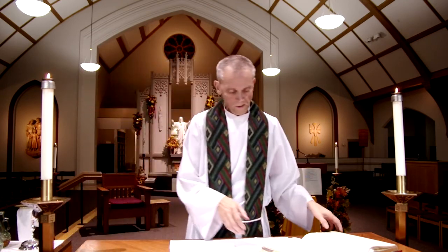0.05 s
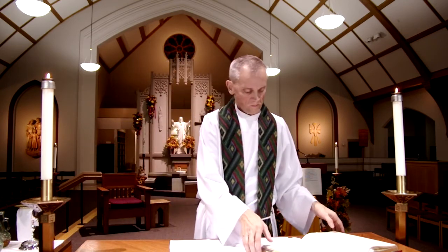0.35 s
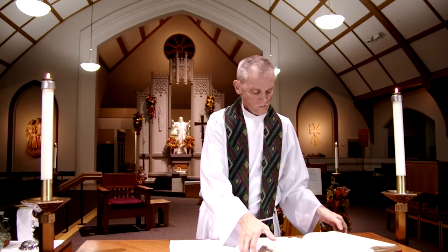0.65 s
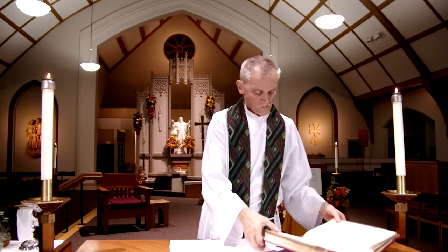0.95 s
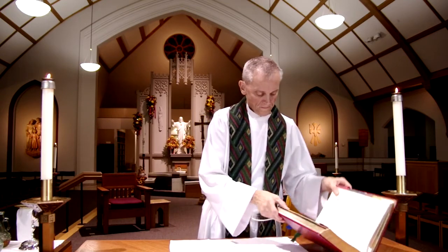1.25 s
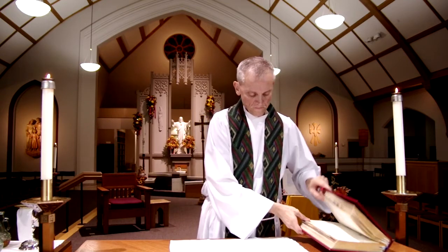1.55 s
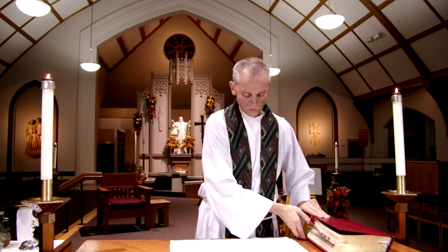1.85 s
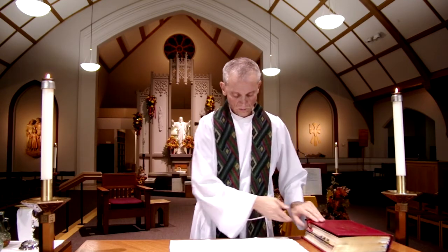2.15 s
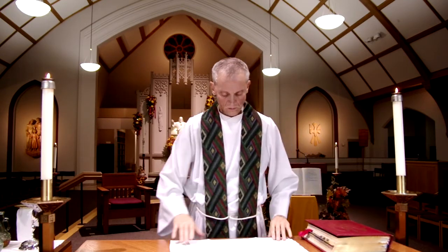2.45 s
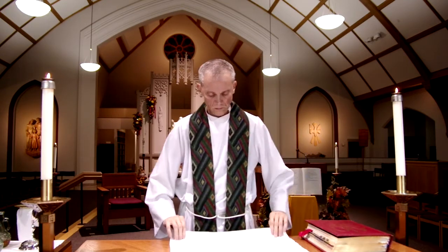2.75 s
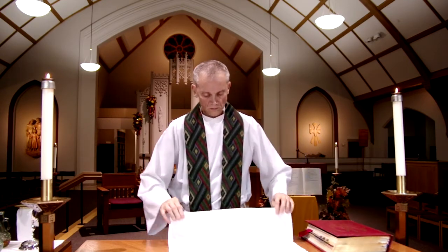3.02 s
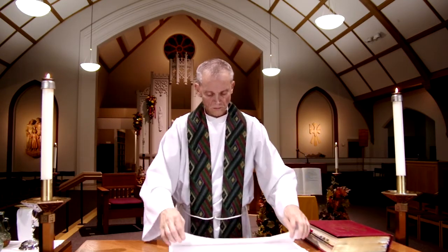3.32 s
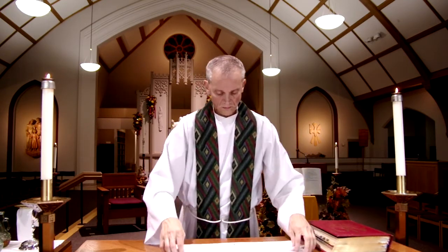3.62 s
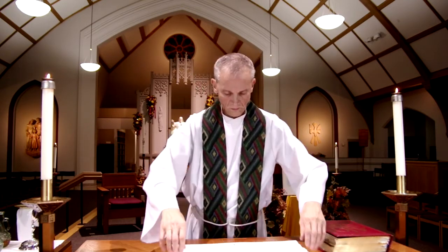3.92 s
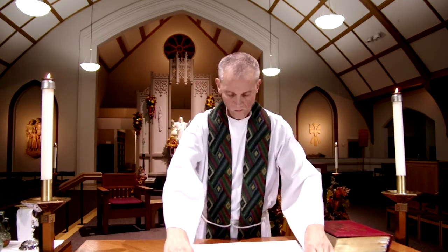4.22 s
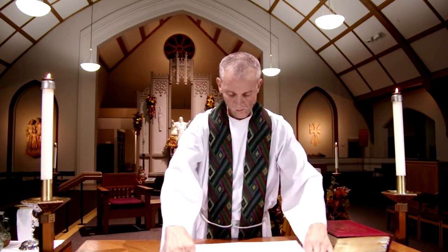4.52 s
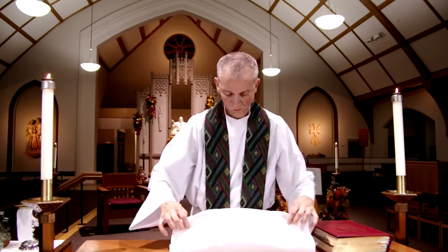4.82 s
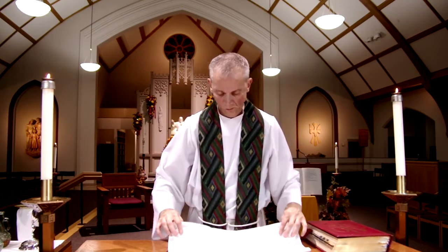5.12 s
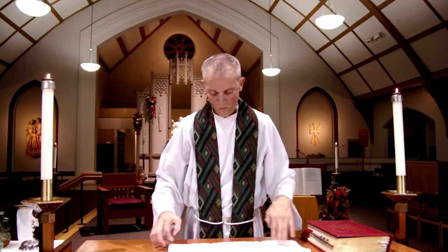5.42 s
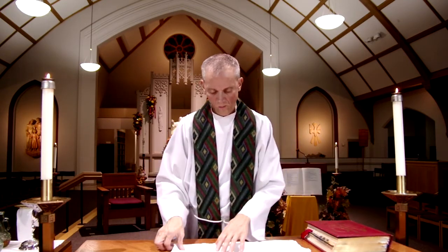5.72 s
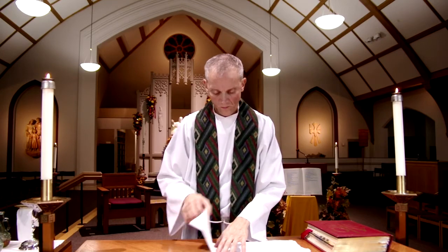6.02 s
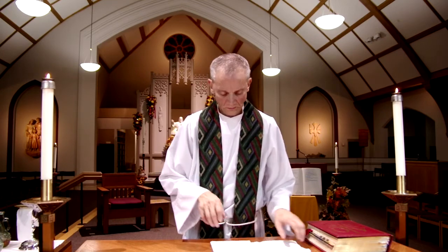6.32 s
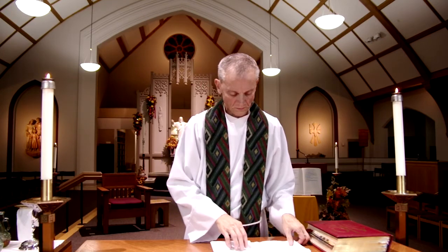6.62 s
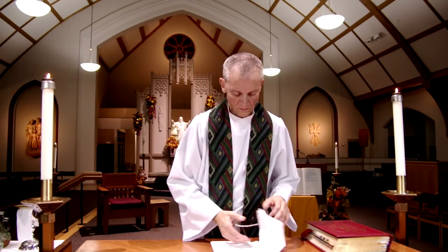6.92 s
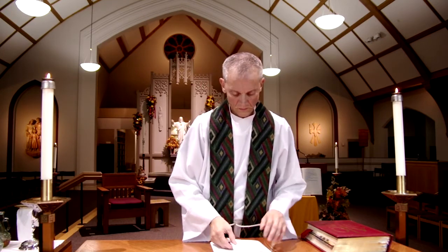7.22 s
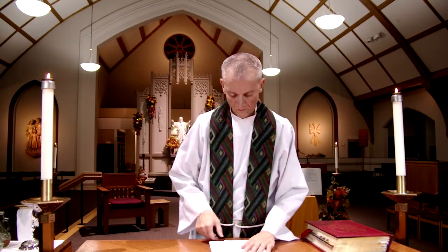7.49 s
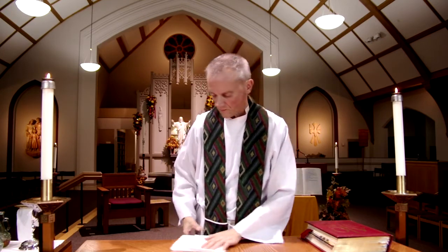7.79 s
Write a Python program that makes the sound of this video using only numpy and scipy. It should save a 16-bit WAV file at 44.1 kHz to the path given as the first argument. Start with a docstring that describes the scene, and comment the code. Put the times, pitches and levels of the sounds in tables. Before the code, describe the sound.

One microphone sits close to a wooden altar in a quiet church, with low ventilation rumble, faint hiss and a slight echo throughout. During the first second and a half, a heavy book is handled: pages rustle, the binding ticks, and the covers slide and knock lightly on the wood. Around 1.7 seconds it claps shut and lands on its edge in a quick cluster of knocks. At 2.1 seconds it falls flat with the loudest thump, and the altar booms briefly; a small knock follows. From 2.5 seconds on, everything is much softer. A linen cloth is lifted and laid out, with rustling sleeves, a few finger knocks near 4.4 seconds and light swishes around 5 seconds. More taps come near 5.6 seconds as it is folded. Fingertips rub along a crease around 6.5 seconds, and from 7.4 seconds a hand gently smooths the cloth.

```python
"""Book and linen on an altar

A quiet hall, one microphone close to a wooden altar. A heavy book is closed and set down:
its covers clap, it lands on an edge, then falls flat, and the altar booms at its lowest mode.
A linen cloth is lifted, laid out and folded: sleeves rustle, fingers knock and brush on the wood.
The far walls return a faint tail; ventilation rumble and microphone hiss lie underneath."""
import sys
import numpy as np
from scipy import signal
from scipy.fft import rfft, irfft
from scipy.io import wavfile
from scipy.ndimage import uniform_filter1d

SR = 44100
rng = np.random.default_rng(int(sys.argv[2]) if len(sys.argv) > 2 else 0)


def store_wav(level_fs):
    """Save 16-bit WAV to argv[1]."""
    pcm = np.round(np.clip(np.atleast_2d(level_fs), -1, 1) * 32767)
    wavfile.write(sys.argv[1], SR, pcm.T.astype(np.int16))


N = 350595
LEAD_S = 0.015  # room for the grit ahead of each contact


def book():
    """The book claps shut and lands on the altar, its weight damping the top."""
    # blows of the book, heavier ones reaching lower: start_s, peak_db, contact_ms, low_cut_hz
    blows = [(0.846, -35.5, 0.69, 600), (0.8675, -24, 0.78, 200), (0.887, -30.5, 0.83, 350),
             (1.097, -30, 5.2, 170), (1.103, -34, 2.9, 189), (1.120, -28.5, 4, 190),
             (1.157, -34.5, 5.4, 190), (1.432, -37, 3.7, 168), (1.522, -34, 0.57, 248),
             (1.6897, -16, 1.3, 830), (1.693, -25, 1.9, 220), (1.7108, -19, 1.4, 597),
             (1.732, -12.5, 3.75, 131), (1.7365, -11, 0.79, 204), (1.7385, -17.5, 1.24, 260),
             (1.749, -17.5, 3.46, 262), (1.784, -36.5, 0.69, 600), (1.8222, -13.5, 0.55, 330),
             (1.903, -32.5, 1, 398), (1.956, -28.5, 0.5, 232), (2.0908, -4, 6.77, 76.6),
             (2.1012, -16.5, 3.75, 296), (2.249, -30.5, 1.05, 600), (2.255, -22, 4.4, 200)]
    return knocks(blows, ring_db=-3.8, dense_db=-14.5, grit_db=-7.5,
                  rise_s=0.0014, fall_s=0.0011, muffle=0.13)


def knocks(blows, ring_db, dense_db, grit_db, rise_s, fall_s, muffle=0, free_hz=131):
    """Each blow is heard directly, through the top's main modes and through its many weak ones."""
    # main modes of the altar top: pitch_hz, level_db, t60_s
    modes = [(95.5, 11, .5), (99.7, 16, 0.074), (121.8, 16.5, 0.39), (157.7, 11, 0.4), (207.3, 12.5, 0.096),
             (213, 4.5, 0.19), (238, 7, 0.077), (309, 13, 0.15), (325, 6, 0.17), (412, -11, 0.18),
             (469, 9.5, 0.29), (590, 8, 0.16), (662, -12, 0.09), (840, -0.5, 0.067), (977, 6.5, 0.063),
             (1058, 0.5, 0.081)]
    # decay of the wood's weak modes: frequency_hz, t60_s
    wood_decay = [(100, 0.14), (300, 0.32), (1000, 0.05), (4000, 0.01)]
    t = np.arange(SR // 2) / SR
    top = signal.unit_impulse(len(t))
    for hz, db, t60 in modes:
        damping = np.log(1000) / t60
        loaded = damping + muffle * max(hz - free_hz, 0)  # a load drains the upper modes
        strength = gain_of(db + ring_db) * 2 * damping / SR
        top += strength * np.exp(-loaded * t) * np.cos(2 * np.pi * hz * t)
    out = np.zeros(N)
    for start, db, contact_ms, low_hz in blows:
        force = rough_contact(push(contact_ms, low_hz), grit_db, rise_s, fall_s)
        weak_modes = gain_of(dense_db) * tail(wood_decay, len(t))  # new at each spot on the top
        blow = signal.fftconvolve(force, top + weak_modes)
        add(out, start - LEAD_S, gain_of(db) * blow / abs(blow).max())
    return out


def push(contact_ms, low_hz, size=4096):
    """A smooth bump of force; the longer the contact, the duller the blow."""
    phase = np.minimum(np.arange(size) / SR * 1000 / contact_ms, 1)
    return low_cut(np.sin(np.pi * phase) ** 2 + 1e-20, low_hz)


def rough_contact(force, grit_db, rise_s, fall_s):
    """Small contacts gather before the main one, which comes LEAD_S in, and scatter after it."""
    t = np.arange(-LEAD_S, 2 * LEAD_S, 1 / SR)
    grit = rng.standard_normal(len(t)) * np.exp(np.minimum(t / rise_s, -t / fall_s))
    grit *= gain_of(grit_db) / np.linalg.norm(grit)
    contacts = low_cut(grit, hz=480)  # such small contacts carry no weight
    contacts[round(LEAD_S * SR)] += 1
    return signal.fftconvolve(force, contacts)


def altar_sway(pitch_hz=48.54, t60_s=1.11):
    """The whole altar swings at its lowest mode, building up under each load."""
    # weight coming onto the altar: start_s, level_db, build_up_s
    loads = [(0.353, -26.5, 0.22), (0.843, -36.5, 0.075), (1.734, -15.5, 0.075), (2.093, -13.5, 0.015),
             (2.581, -30, 0.021), (3.191, -41, 0.043), (3.678, -26, 0.73), (3.998, -37.5, 0.069),
             (4.28, -31.5, 0.11), (5.591, -35, 0.13), (6.529, -33, 0.26), (7.598, -43.5, 0.06)]
    t, out = np.arange(2 * SR) / SR, np.zeros(N)
    swing = np.cos(2 * np.pi * pitch_hz * t) * np.exp(-np.log(1000) * t / t60_s)
    for start, db, build_up in loads:
        add(out, start, gain_of(db) * (1 - np.exp(-t / build_up)) * swing)
    return out


def fingers(tap_db=-47, tap_low_hz=243, db_per_octave=44, slip_ms=1.6, slip_low_hz=313):
    """Taps and slips strike the top and let it ring; a tap above tap_db reaches below tap_low_hz."""
    # fingers and knuckles on the wood: start_s, peak_db, contact_ms
    taps = [(0.525, -29.5, 0.37), (0.605, -40, 0.84), (0.615, -35, 1.65), (3.2113, -44, 0.57),
            (4.381, -27, 1.66), (4.439, -35.5, 0.78), (4.517, -39, 0.77), (4.53, -37.5, 0.37),
            (5.587, -36.5, 0.7), (5.595, -35.5, 2), (5.660, -32, 0.73), (5.669, -30.5, 2.5),
            (5.720, -37, 2.1), (5.790, -38.5, 1.9), (5.17, -44, 1.4), (6.343, -38, 0.67), (6.522, -37, 1.5),
            (6.709, -39, 1.5), (6.77, -46.5, 1.3), (7.153, -44.5, 0.8), (7.199, -42, 0.77),
            (7.636, -41, 0.89)]
    blows = [(start, db, contact_ms, tap_low_hz * 2 ** ((tap_db - db) / db_per_octave))
             for start, db, contact_ms in taps]
    blows += [(start, db, slip_ms, slip_low_hz) for start, db, _ in slips()]
    return knocks(blows, ring_db=6.0, dense_db=-1.5, grit_db=-2.5, rise_s=0.0023, fall_s=0.0048)


def slips(fade_db_per_s=153, tick_offset_db=-5.5):
    """A fingertip sticks and slips, its blows weakening. Gives start_s, blow_db, tick_db."""
    # runs along a crease: start_s, length_s, slips_per_s, peak_db
    runs = [(6.554, .03, 88, -37.5), (6.616, .05, 65, -35)]
    return [(start + elapsed, db - fade_db_per_s * elapsed, db + tick_offset_db)
            for start, length, rate, db in runs for elapsed in np.arange(0, length, 1 / rate)]


def snaps(spread=1.66, slip_tick_hz=1670):
    """Sharp ticks with a few milliseconds of scatter from the book and the top."""
    # dry snaps of binding, pages, nails and starched linen: start_s, peak_db, centre_hz
    dry_snaps = [(0.110, -37.5, 7500), (0.523, -38, 3640), (0.527, -41, 2100), (0.832, -37.5, 2400),
                 (0.8674, -31, 2280), (0.890, -29, 2700), (0.923, -38, 4200), (0.94, -34, 9500),
                 (0.941, -26.5, 3540), (1.106, -33.5, 2960), (1.214, -35.5, 1800), (1.28, -38, 5900),
                 (1.523, -35.5, 4000), (1.729, -30.5, 3630), (1.8445, -36.5, 2930), (1.979, -45.5, 5500),
                 (2.239, -39.5, 4960), (2.249, -36.5, 2100), (3.2113, -46, 2300), (4.061, -41.5, 2800),
                 (4.382, -33.5, 2300), (4.448, -37.5, 3400), (4.515, -44, 2220), (4.988, -41, 2750),
                 (6.708, -40, 1590), (6.7715, -49, 2000), (7.153, -53, 2100), (7.226, -52, 2400)]
    cloth_ticks = [(start, db, slip_tick_hz) for start, _, db in slips()]
    out = np.zeros(N)
    for start, db, hz in list(dry_snaps) + cloth_ticks:
        tick = rough_contact(pulse(hz / spread, hz * spread), grit_db=-0.5, rise_s=0.00014, fall_s=0.0017)
        add(out, start - LEAD_S, gain_of(db) * tick / abs(tick).max())
    return out


def pulse(low_hz, high_hz, size=512):
    """One sharp tick, holding the band low_hz to high_hz."""
    high_cut = signal.butter(6, min(high_hz, SR / 2 - 1), fs=SR, output="sos")
    return low_cut(signal.sosfilt(high_cut, signal.unit_impulse(size) + 1e-20), low_hz)


def handling(waver_db=4.5, waver_hz=5.2):
    """One friction drives both wood and cloth; between movements, hands and robe never quite rest."""
    drive = friction()
    stir = gain_of(waver_db * flutter(waver_hz))
    return wood_rub(drive, stir) + rustle(drive, stir)


def friction(slips_per_s=420, spread_db=3, slip_share=0.13, clump_db=1.5, clump_hz=40):
    """A smooth slide plus tiny slips of fibres, both coming in clumps."""
    sizes = gain_of(spread_db * np.minimum(rng.exponential(1, N), 4))
    signs = rng.choice([-1, 1], N)
    fibres = unit_rms(sizes * signs * (rng.random(N) < slips_per_s / SR))
    slide = patchy(rng.standard_normal(N))
    blend = np.sqrt(slip_share) * fibres + np.sqrt(1 - slip_share) * slide
    return blend * gain_of(clump_db * flutter(clump_hz))


def patchy(x, depth_db=2.5, patch_cells=6):
    """Shifting folds colour the friction in patches of time and frequency, at rms 1."""
    spectra = signal.stft(x, SR, nperseg=1024)[2]
    patches = uniform_filter1d(rng.standard_normal(spectra.shape), patch_cells, axis=0)
    patches = unit_rms(uniform_filter1d(patches, patch_cells, axis=1))
    return unit_rms(signal.istft(spectra * gain_of(depth_db * patches), SR, nperseg=1024)[1][:N])


def wood_rub(drive, stir, resting_db=-68):
    """Friction sounds low through the wood as the book and palms slide on it."""
    # slides on the top: start_s, length_s, level_db
    slides = [(-0.1, 0.52, -57), (0.51, 0.21, -51), (0.7, 0.23, -48.5), (0.9, 0.87, -54),
              (1.06, 0.16, -52.5), (1.39, 0.23, -44), (1.6, .48, -44), (2.08, .45, -55.5),
              (2.55, 0.21, -54), (3.62, 0.12, -58), (3.95, 0.29, -58), (4.22, 0.44, -56.5),
              (4.41, 0.046, -44.5), (4.77, 0.12, -52), (5.14, 0.061, -62), (5.57, 0.3, -51),
              (6.52, .2, -55.5), (6.72, 0.17, -58), (7.6, 0.092, -56)]
    # spectrum of rubbed wood: frequency_hz, level_db
    rub = [(60, -18), (110, 0.5), (160, 3), (240, 0.5), (350, -6.5), (550, -14), (900, -28), (2000, -60)]
    return np.hypot(swells(slides), gain_of(resting_db) * stir) * coloured(drive, rub)


def rustle(drive, stir, robe_db=-79):
    """Pages, sleeves and linen rub: heavy folds sound dull, a light brush fizzes."""
    # movements of paper and cloth: start_s, length_s, level_db, brightness_db
    movements = [(-0.1, 0.46, -68, -4), (0.05, 0.09, -67, 16), (0.251, 0.13, -74.5, -14),
                 (0.48, 0.54, -75, -8.5), (0.68, 0.13, -66, -2.5), (0.82, .09, -60, -6),
                 (0.9, 0.16, -61, 10), (1.04, 0.24, -59, 2), (1.27, 0.5, -59, 5.5), (1.51, 0.088, -60, -14),
                 (1.8, 0.35, -65.5, 4), (2.065, 0.03, -60, -3.5), (2.17, 0.11, -64.5, 6.5),
                 (2.24, 0.16, -70, -4), (2.548, 0.094, -59.5, 4.5), (2.6, 0.24, -65.5, 6),
                 (2.74, 0.21, -66, 0), (2.85, 0.85, -73.5, -2), (3.66, 0.085, -66.5, 0),
                 (3.77, 0.025, -64, -6.5), (3.86, 0.065, -67.5, 8), (3.95, 0.23, -68, 7),
                 (4.24, 0.14, -69, 2), (4.33, .15, -59.5, 3), (4.5, 0.22, -69, 1.5), (4.66, .34, -65, -8),
                 (4.79, 0.093, -62, -6), (4.97, 0.27, -66.5, -0.5), (5.15, 0.069, -61.5, -3.5),
                 (5.32, 0.11, -65, -5.5), (5.84, 0.054, -68.5, 1), (6.08, 0.09, -69.5, 2),
                 (6.19, 0.44, -71.5, -2), (6.67, 0.076, -69, 8), (6.79, .11, -73.5, -11.5),
                 (6.91, 0.056, -69.5, 5), (7.17, 0.35, -73.5, 5), (7.43, 0.1, -64.5, -2.5),
                 (7.52, 1, -66, 0.5)]
    # spectra of folds, swish and fibre fizz: frequency_hz, level_db
    folds = [(300, -2.5), (600, 3.5), (1000, 6.5), (1350, 2.5), (1900, -0.5), (2600, -8.5), (4000, -43.5)]
    swish = [(1500, -10.5), (2700, -1.5), (3600, 0), (4700, -0.5), (5800, -8), (7500, -14.5),
             (11000, -43.5)]
    fizz = [(5000, -31), (7500, 6.5), (9000, 9.5), (13000, 8.5), (15500, 3.5)]
    out = np.zeros(N)
    for spectrum, offset_db, tilt in [(folds, 2.5, -0.71), (swish, 0, 0), (fizz, -12.5, 0.55)]:
        moving = swells([(start, length, db + tilt * brightness)
                         for start, length, db, brightness in movements])
        envelope = np.hypot(moving, gain_of(robe_db) * stir)
        out += gain_of(offset_db) * envelope * coloured(drive, spectrum)
    return out


def swells(movements, skew=0.57, roundness=0.35, settle_s=0.012):
    """Envelope of movements: each swells fast and fades more slowly in one broad arch, then settles."""
    t, power = np.arange(N) / SR, np.zeros(N)
    for start, length, db in movements:
        during = (t > start) & (t < start + length)
        progress = (t[during] - start) / length
        arch = abs(np.sin(np.pi * progress ** skew)) ** roundness
        power[during] += (gain_of(db) * arch) ** 2
    pole = np.exp(-1 / (settle_s * SR))
    return np.sqrt(signal.lfilter([1 - pole], [1, -pole], power + 1e-20))


def linen():
    """Strokes on cloth and page edges, each a gliding band of friction noise."""
    # four kinds of stroke: start_s, length_s, level_db, start_hz, end_hz
    sweeps = [(4.61, 0.26, -58.5, 4000, 1000), (5.08, 0.16, -61, 4380, 2620),
              (5.15, 0.26, -58.5, 1350, 1060), (7.42, 0.14, -63.5, 3900, 3760)]  # linen drawn through the air and over the top
    creases = [(6.52, 0.19, -48, 310, 333), (6.52, 0.17, -53, 534, 600), (6.53, 0.16, -64.5, 1890, 2140)]  # fingertips chattering along a crease, one row a resonance
    crumples = [(0.852, .05, -53, 1780, 3300), (1.18, 0.048, -51, 4470, 3200), (4.36, .11, -77, 2300, 3600)]  # page edges and starched linen crumpling
    smoothing = [(7.45, .6, -76, 10000, 10800)]  # a flat hand smoothing the linen
    return (strokes(sweeps, width_hz=1540, clump_db=0, clump_hz=50)
            + strokes(creases, width_hz=320, clump_db=3, clump_hz=90)
            + strokes(crumples, width_hz=2500, clump_db=1.5, clump_hz=263)
            + strokes(smoothing, width_hz=5000, clump_db=1.2, clump_hz=30))


def strokes(rows, width_hz, clump_db, clump_hz):
    """Friction through a resonance that glides as the stroke swells and fades."""
    out = np.zeros(N)
    drive = rng.standard_normal(N) * gain_of(clump_db * flutter(clump_hz))
    for start, length, db, start_hz, end_hz in rows:
        hz = np.geomspace(start_hz, end_hz, round(length * SR))
        stroke = np.resize(drive[round(start * SR):], len(hz))
        stroke = resonate(resonate(stroke, hz, width_hz), hz, width_hz)
        add(out, start, gain_of(db) * unit_rms(stroke) * signal.windows.tukey(len(hz), 0.7))
    return out


def resonate(x, hz, width_hz):
    """A moving resonance: shifts the curve hz down to zero, smooths, and shifts back."""
    carrier = np.exp(2j * np.pi * np.cumsum(hz) / SR)
    pole = np.exp(-np.pi * width_hz / SR)
    return 2 * (carrier * signal.lfilter([1 - pole], [1, -pole], x / carrier)).real


def hall(near, wet_db=-23.0, delay_s=0.02):
    """The close sound, plus a long, faint, bass-heavy tail from the far walls."""
    # reverberation time of the hall: frequency_hz, t60_s
    decay = [(100, 3), (300, 0.78), (1000, 2.6), (4000, 0.88), (12000, 1.45)]
    # tone of the reverberation: frequency_hz, level_db
    tone = [(60, 8), (100, 4), (170, 10.5), (250, -12), (500, 4), (1500, -3), (8000, 0.5)]
    late = coloured(tail(decay, 2 * SR), tone)
    echoes = np.concatenate([np.zeros(round(delay_s * SR)), late / np.linalg.norm(late)])
    return near + gain_of(wet_db) * signal.fftconvolve(near, echoes[:-SR // 4])[:N]


def tail(t60s, size):
    """Dense echoes of energy 1, each band dying at its own speed."""
    hz, t, spectra = signal.stft(rng.standard_normal(size), SR, nperseg=256)
    fade = gain_of(-60 * t / value_at(t60s, hz)[:, None])
    echoes = signal.istft(spectra * fade, SR, nperseg=256)[1][:size]
    return echoes / np.linalg.norm(echoes)


def room_tone(level_db=-56.5, waver_db=1.5):
    """Low ventilation rumble and faint microphone hiss, wavering slowly in level."""
    # spectrum of rumble and hiss: frequency_hz, level_db
    spectrum = [(15, -6.5), (25, -1), (36, -9), (55, 3.5), (80, -5.5), (115, -0.5), (170, -12), (400, -15),
                (700, -22.5), (1000, -27), (1300, -30), (4300, -36.5), (6000, -41), (15000, -46.5)]
    return gain_of(level_db + waver_db * flutter(hz=1)) * coloured(rng.standard_normal(N), spectrum)


def gain_of(db):
    """Decibels to amplitude."""
    return 10 ** (np.asarray(db) / 20)


def unit_rms(x):
    """Scales to rms 1."""
    return x / np.sqrt(np.mean(x ** 2) + 1e-20)


def value_at(points, hz):
    """Reads a table on a log-frequency axis."""
    table_hz, values = np.transpose(points)
    return np.interp(np.log(hz + 1), np.log(table_hz + 1), values)


def add(mix, start_s, sound):
    """Mixes a sound in at start_s."""
    part = mix[round(start_s * SR):][:len(sound)]
    part += sound[:len(part)]


def low_cut(x, hz):
    """Rolls off the bass below hz."""
    return signal.sosfilt(signal.butter(2, hz, "high", fs=SR, output="sos"), x)


def coloured(x, spectrum):
    """Shapes x with a spectrum, at rms 1."""
    gains = gain_of(value_at(spectrum, np.fft.rfftfreq(len(x), 1 / SR)))
    return unit_rms(irfft(rfft(x) * gains, len(x)))


def flutter(hz):
    """Random wavering up to about hz, at rms 1."""
    rolloff = 1 + (np.fft.rfftfreq(N, 1 / SR) / hz) ** 4
    return unit_rms(irfft(rfft(rng.standard_normal(N)) / rolloff, N))


def scene():
    """Book, hands and cloth close to the microphone, the hall behind them, in mono."""
    near = book() + fingers() + linen() + snaps() + handling()
    return (hall(near) + altar_sway() + room_tone())[None]


def record(dry, edge_hz=15600):
    """The recorder's band limit."""
    high_cut = signal.firwin(511, edge_hz, window=("kaiser", 9), fs=SR)
    return signal.oaconvolve(dry, high_cut[None], "same")


dry = scene()
out = record(dry)
store_wav(out)
```